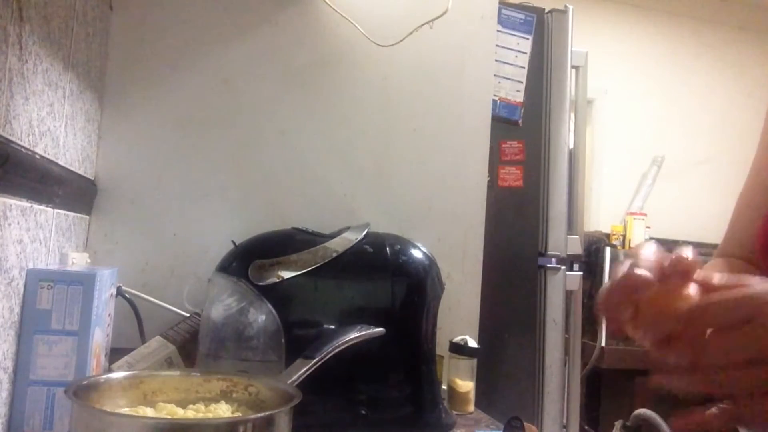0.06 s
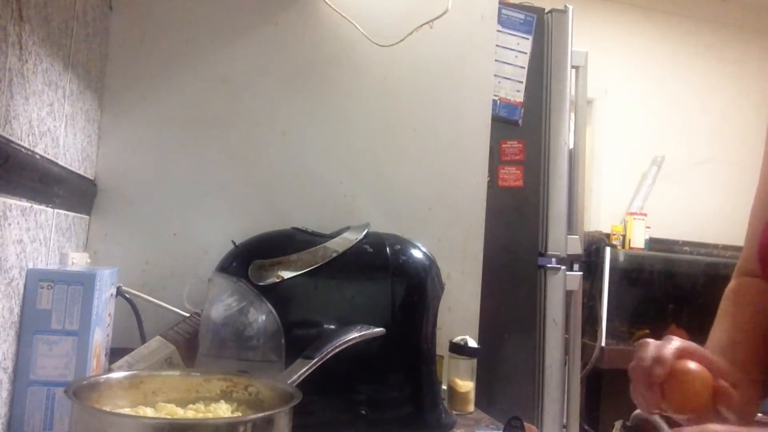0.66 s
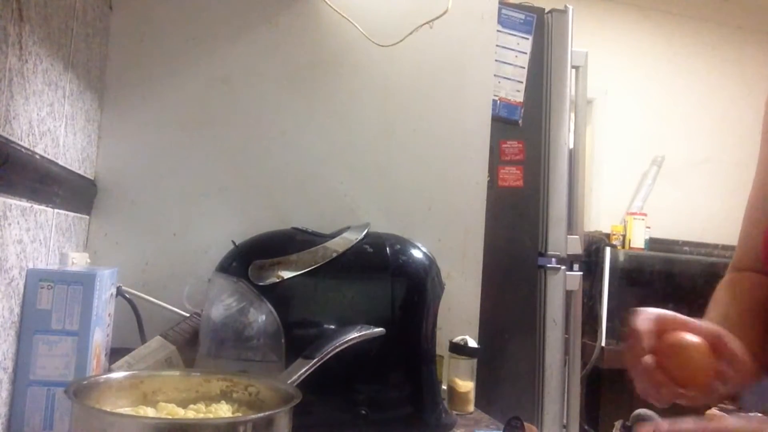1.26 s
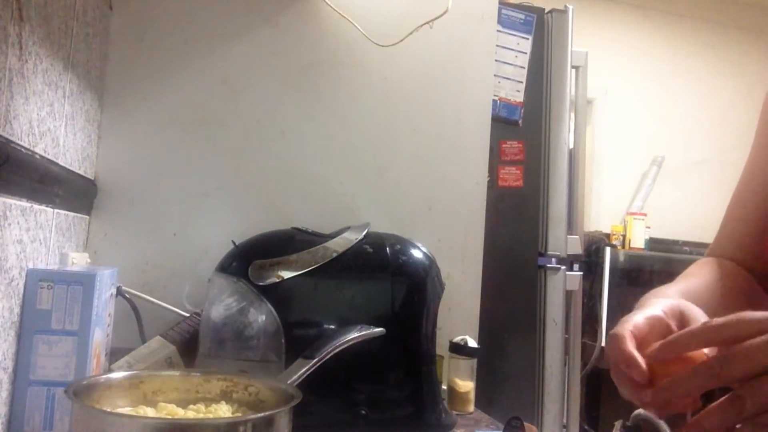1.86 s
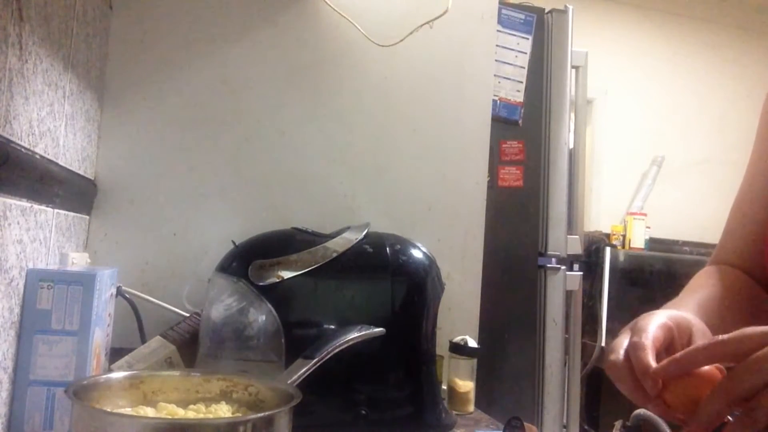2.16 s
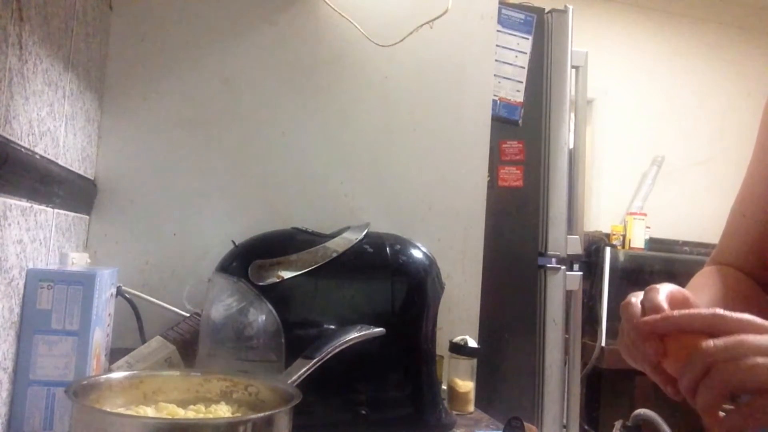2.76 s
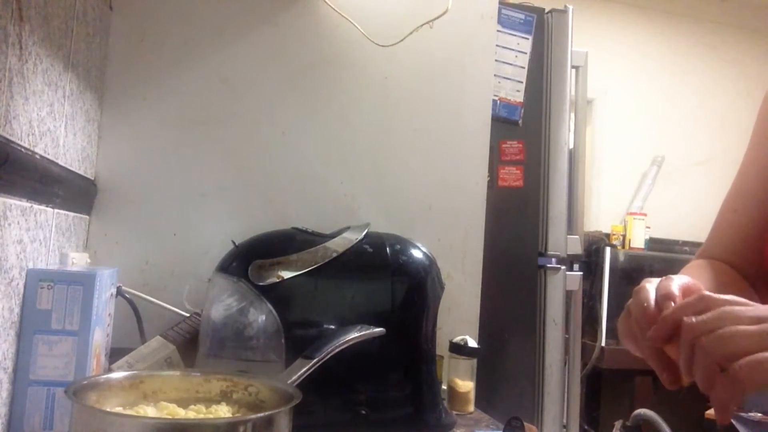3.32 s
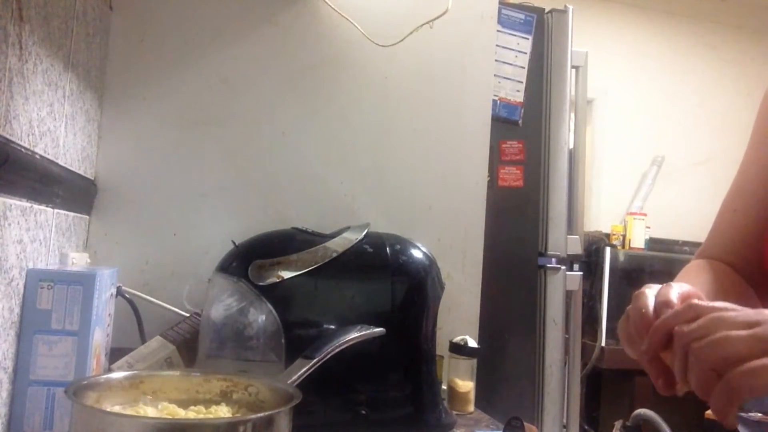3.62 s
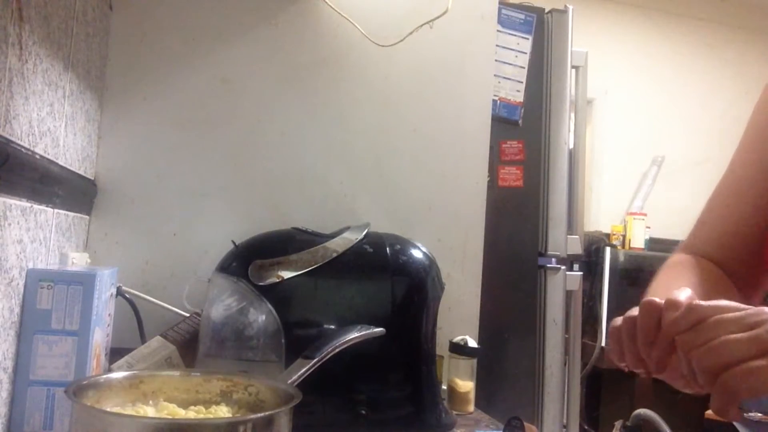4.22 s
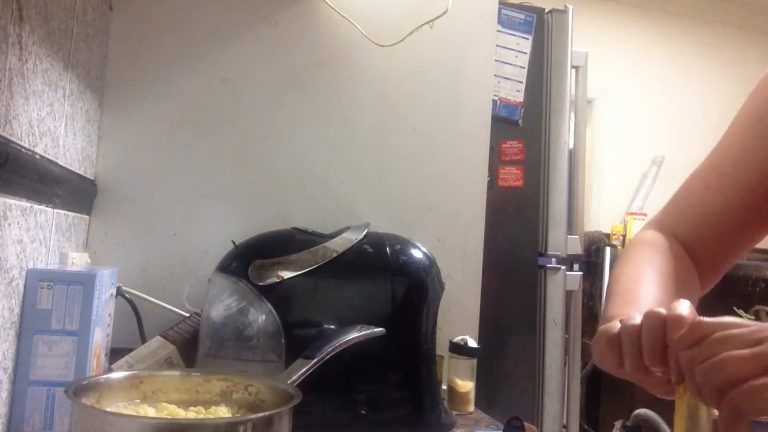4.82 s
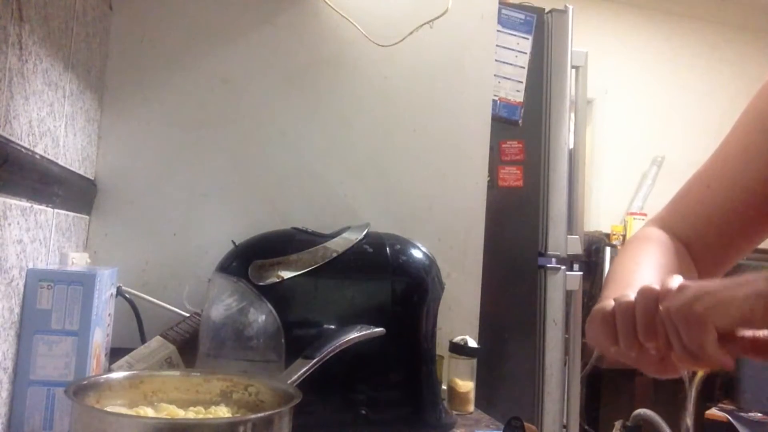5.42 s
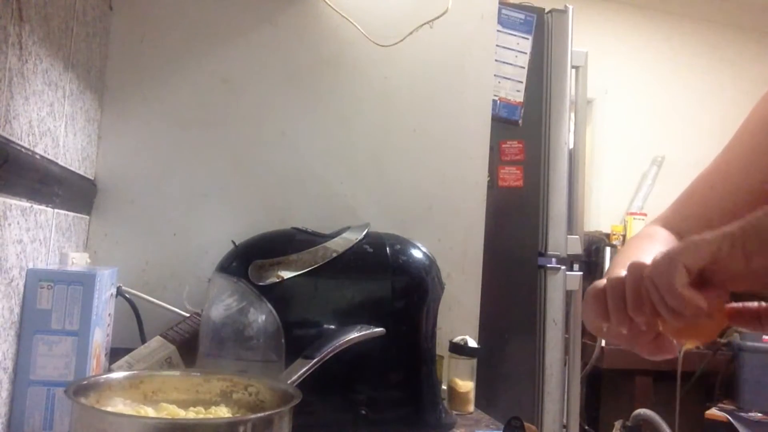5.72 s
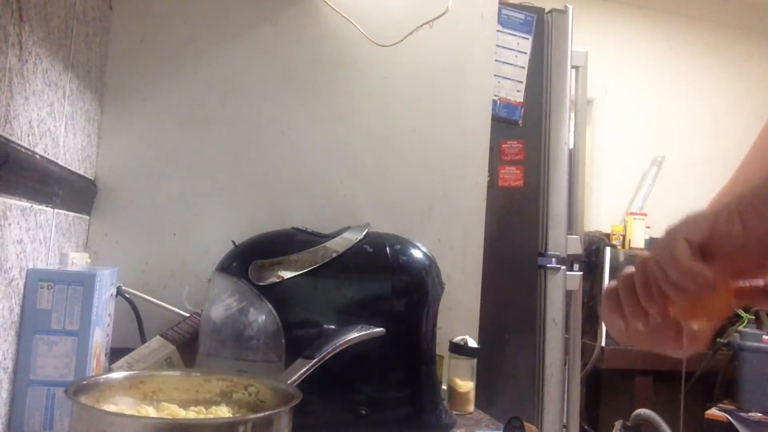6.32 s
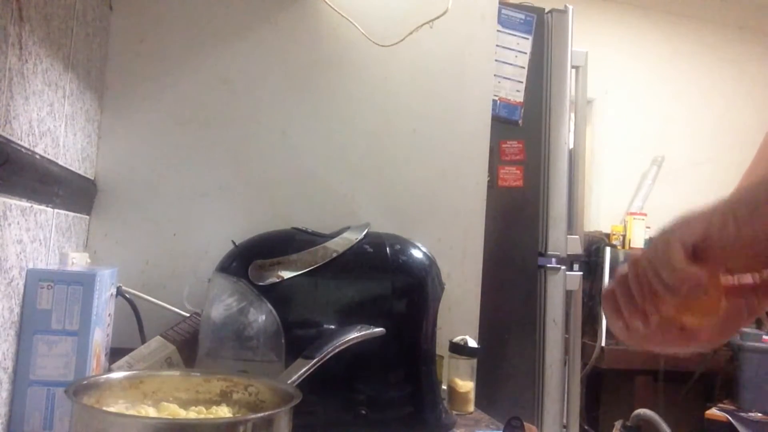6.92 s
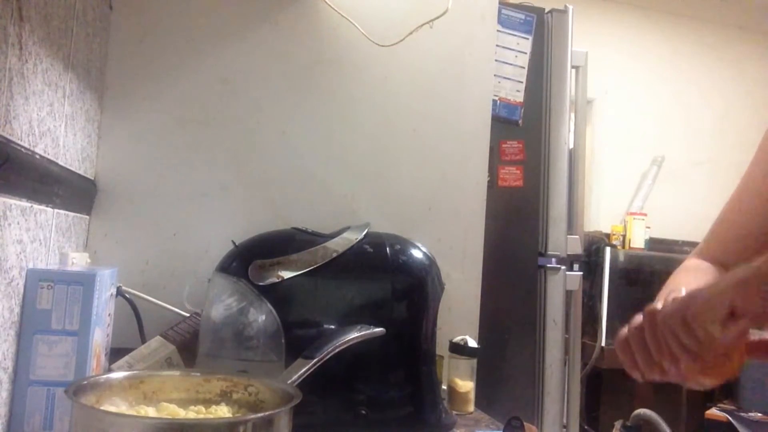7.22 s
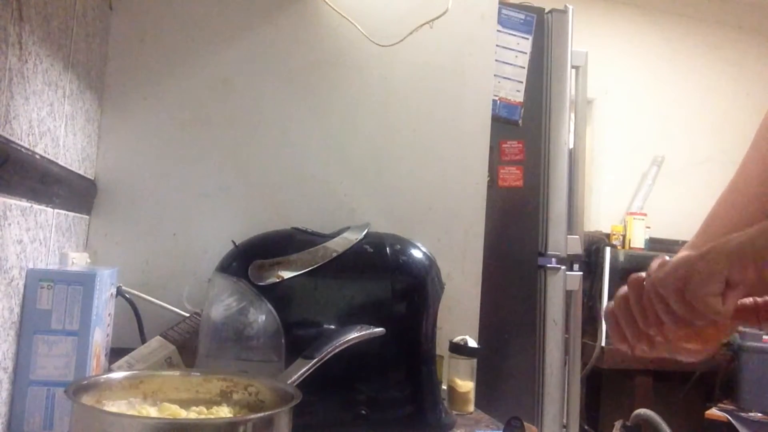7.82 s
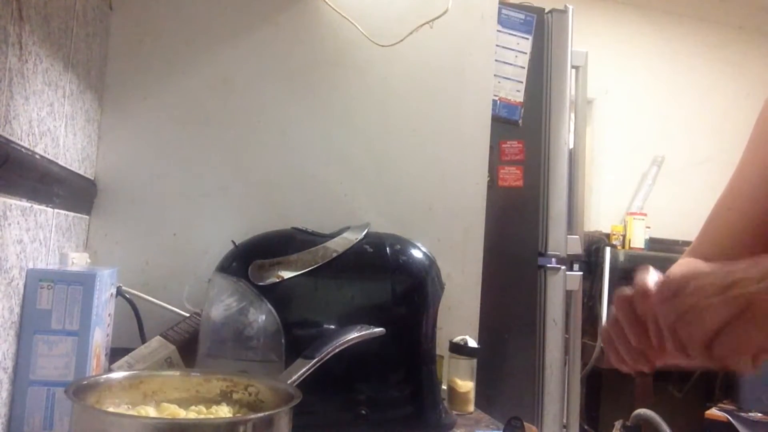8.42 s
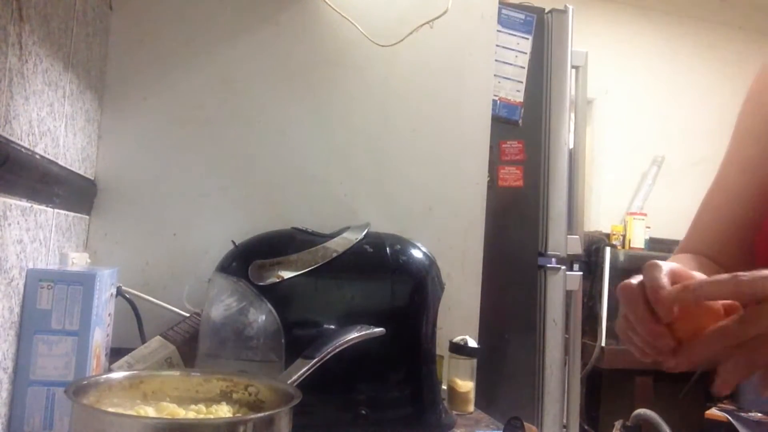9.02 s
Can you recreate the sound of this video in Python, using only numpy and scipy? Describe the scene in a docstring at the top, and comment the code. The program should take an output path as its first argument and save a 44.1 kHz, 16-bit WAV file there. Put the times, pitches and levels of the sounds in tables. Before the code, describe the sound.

Two sharp egg taps, then crackling and crunching eggshell in a small kitchen, with a softly simmering pan and a throbbing appliance.

```python
"""Cracking an egg in a small kitchen

An appliance motor throbs and slowly loses speed; bubbles burst faintly in a pan over the room's hiss.
Wet fingers slip on an egg. It touches a hard edge, is knocked on it once and is cracked with a sharp
tap, and the worktop thuds along. Thumbs pry the shell open: each crack runs in tiny jumps that make
the pieces and the hollow inside ring. At the end the empty halves crunch in the hand."""
import sys
import numpy as np
from scipy import signal
from scipy.fft import rfft, irfft, next_fast_len
from scipy.io import wavfile
from scipy.ndimage import uniform_filter1d

SR = 44100
rng = np.random.default_rng(int(sys.argv[2]) if len(sys.argv) > 2 else 0)


def inscribe(sig):
    """Save sig as 16-bit PCM at rate SR to the path in sys.argv[1].

    A 1-D sig is mono; a 2-D sig holds one channel per row.
    Samples are clipped to [-1, 1] before scaling.
    """
    pcm = np.round(np.clip(np.atleast_2d(sig).T, -1, 1) * 32767)
    wavfile.write(sys.argv[1], SR, pcm.astype(np.int16))


N = 399976
T = np.arange(N) / SR  # seconds since the scene began
AGE = T[:SR // 2]  # seconds since one short sound began

# The tone colour of the simmering pan. Each row: frequency in Hz, level in dB.
PAN_COLOUR = [(150, -9), (330, 7), (480, 4.5), (630, 3.5), (780, -3), (970, 2), (1250, -4.5), (1400, 3),
              (1620, -10), (2340, -2), (2700, -9), (3200, -4.5), (4400, -13), (7500, -20), (16000, -40)]
# The tone colour of breaking shell. Each row: frequency in Hz, level in dB.
SHELL_COLOUR = [(200, -36), (600, -24), (950, -52), (1500, -13), (2050, -40), (2550, 2.5), (2950, -9.5),
                (3400, 2.5), (4500, 0.5), (5550, 2), (6400, 1), (7750, 2), (9300, -1), (11200, -5),
                (14500, -2), (18000, -27)]
# How a bit of shell, or the edge, rings around its pitch. Each row: multiple of the pitch, level in dB.
RING_SHAPE = [(.2, -51), (.6, -35), (.84, -11.5), (.95, 2), (1.05, 3.5), (1.16, -20), (1.5, -18.5),
              (8, -52)]


def undb(db):
    """Turn decibels into a number to multiply a sound by."""
    return 10 ** (np.asarray(db) / 20)


def unit(x):
    """Scale a sound so that its average strength (rms) is 1."""
    return x / np.sqrt(np.mean(x ** 2))


def add(out, start_s, x):
    """Mix the sound x into out, beginning at start_s."""
    i = int(start_s * SR)
    out[i:i + len(x)] += x[:N - i]


def curve(rows):
    """Join rows that begin with a time by straight lines, giving one curve for each further column."""
    times, *columns = np.transpose(rows)
    return [np.interp(T, times, column) for column in columns]


def at_hz(rows, hz):
    """Look up the value at hz between rows of frequency and value."""
    frequencies, values = np.transpose(rows)
    return np.interp(np.log(hz + 1), np.log(frequencies), values)


def noise(colour, size):
    """Steady noise with the given tone colour."""
    padded = next_fast_len(size)
    hz = np.arange(padded // 2 + 1) * SR / padded
    spectrum = rfft(rng.standard_normal(padded)) * undb(at_hz(colour, hz))
    return unit(irfft(spectrum, padded)[:size])


def fade(t60):
    """A dying away; t60 is the fade time, the seconds it takes to drop by 60 dB."""
    return np.exp(-np.log(1000) * AGE / t60)


def soften(x, hz):
    """A soft contact or a covering hand takes away the treble above hz."""
    return signal.sosfilt(signal.butter(2, min(hz, SR / 2 - 1000), fs=SR, output="sos"), x)


def burst(colour, t60, size=len(AGE)):
    """Countless short vibrations struck together sound like fading noise of this colour."""
    decay = fade(t60)[:size]
    spectrum = rfft(rng.standard_normal(size) * decay)
    # even out the energy over every 400 Hz
    spectrum /= np.sqrt(uniform_filter1d(abs(spectrum) ** 2, size=size * 400 // SR))
    # build a colour filter that makes no sound before the strike
    hz = np.arange(len(spectrum)) * SR / size
    cepstrum = irfft(np.log(undb(at_hz(colour, hz))), size)
    cepstrum[1:size // 2] *= 2
    cepstrum[size // 2:] = 0
    x = irfft(spectrum * np.exp(rfft(cepstrum)), size) * (np.arange(size) < size // 2)
    return x * np.sqrt(np.sum(decay ** 2) / np.sum(x ** 2))


def resonance(shape, hz, t60, size=len(AGE)):
    """Many vibrations crowd around one pitch and fade together."""
    return burst(sorted((hz * multiple, db) for multiple, db in shape), t60, size)


def ring(tones):
    """A struck object rings with a few fading tones, which start off in alternating directions."""
    return sum((-1) ** k * undb(db) * fade(t60) * np.sin(2 * np.pi * hz * AGE)
               for k, (hz, db, t60) in enumerate(tones))


def motor(start_hz=24.85, slowing_hz_per_s=0.77, settled_hz=21.67, sag_hz_per_s=0.078, build_s=1):
    """A slowing shaft makes a cabinet hum; neighbouring tones beat together into one throb a turn."""
    # The hum. Each row: time in seconds, levels in dB of the tones at 5, 6 and 7 times the turning
    # speed, level in dB of the overtones.
    hum_levels = [(1.25, -53, -51.5, -67, -77), (1.85, -71, -50.5, -59, -74), (2.2, -74, -58, -62, -73),
                  (2.55, -48, -55, -50, -60), (2.9, -38.5, -39.5, -46.5, -55.5),
                  (3.2, -47.5, -62, -50.5, -62.5), (3.55, -44.5, -34.5, -44, -63),
                  (3.85, -38, -42, -43, -67), (4.12, -50.5, -54, -49, -73), (4.4, -44.5, -50.5, -49, -55),
                  (4.8, -44, -49, -58, -65), (5.25, -43, -49.5, -55, -75), (5.7, -45.5, -68, -52.5, -65),
                  (6.1, -50.5, -57, -83, -68), (6.5, -42, -46, -52, -73), (7.7, -46, -48.5, -57, -89),
                  (8.25, -50, -50, -88, -63), (8.7, -70, -47, -60, -74), (9.07, -62, -53, -55.5, -62)]
    # Overtones the cabinet lets through. Each row: multiple of the turning speed, level in dB.
    overtones = [(8, -5.5), (10, 0), (11, -0.5)]
    # A low drone that follows the motor and swells late. Each row: time in seconds, level in dB.
    drone_levels = [(0, -57.5), (3, -61.5), (4.5, -86), (7.2, -60), (8.2, -53), (9.07, -59)]
    # The cabinet's rumble. Each row: frequency in Hz, level in dB.
    rumble_colour = [(20, -35), (35, -24), (48, -5.5), (58, -6.5), (75, -17.5), (100, 1.5), (140, -9),
                     (180, -10.5), (260, -20.5), (600, -46.5)]
    turns_per_s = np.maximum(start_hz - slowing_hz_per_s * T, settled_hz - sag_hz_per_s * T)
    angle = 2 * np.pi * np.cumsum(turns_per_s) / SR
    *tones_db, overtones_db = curve(hum_levels)
    hum = sum(undb(db) * np.cos(k * angle) for k, db in zip((5, 6, 7), tones_db))
    hum += sum(undb(overtones_db + db) * np.cos(k * angle) for k, db in overtones)
    drone = np.sqrt(2) * undb(curve(drone_levels)[0] - 1) * np.sin(2.665 * angle)
    rumble = undb(-53) * noise(rumble_colour, N)
    build_up = undb(-7 * np.maximum(1 - T / build_s, 0))
    return build_up ** 2 * hum + build_up * rumble + drone


def room_hiss(flutter_db=2.5, flutter_hz=25):
    """The air of the kitchen hisses and flutters slightly."""
    # The tone colour of the hiss. Each row: frequency in Hz, level in dB.
    colour = [(20, -7), (150, 6), (260, 1), (330, 8), (480, -3), (650, -5), (780, -15.5), (1000, -2.5),
              (1250, -13), (2500, -11), (4000, -12.5), (7500, -12.5), (8600, -18), (15500, -18)]
    # Its loudness. Each row: time in seconds, level in dB.
    levels = [(0, -59), (2.3, -59), (4.3, -58.5), (6, -59), (9.07, -58)]
    flutter = noise([(1, 0), (flutter_hz, 0), (flutter_hz * 4, -60)], N)
    return undb(curve(levels)[0] + flutter_db * flutter) * noise(colour, N)


def plop(t60, tone_db, swell_s=0.00059, rise_per_s=6):
    """A bubble opens: a wet puff in the pan and a brief rising tone."""
    hz = 700 * 5 ** rng.random()
    tone = np.sin(2 * np.pi * hz * AGE * (1 + rise_per_s * AGE / 2)) * fade(t60)
    return (burst(PAN_COLOUR, t60) + undb(tone_db) * tone) * (1 - np.exp(-AGE / swell_s))


def simmer(medium_count=20, small_count=260, tiny_count=3000, spatter_s=0.017, spatter_db=-8):
    """A pan simmers: bigger bubbles burst and spatter, small ones pop and the tiniest fizz."""
    # The largest bubbles. Each row: start in seconds, level in dB.
    large = [(0.012, -49.5), (1.405, -47.5), (1.651, -50), (2.353, -45.5), (2.837, -52.5), (4.347, -46.5),
             (4.412, -52), (4.878, -48.5), (5.286, -50), (5.756, -48.5), (5.865, -49), (6.035, -54),
             (6.049, -43.5), (6.229, -49.5), (6.346, -48.5), (6.362, -47), (6.384, -48.5), (6.685, -49.5),
             (6.799, -48), (6.84, -52), (7.35, -53), (7.878, -48.5)]
    out = np.zeros(N)
    pops = [plop(t60=0.035, tone_db=-3) for _ in range(16)]
    # medium bubbles come loosely one after another from 1 second on
    medium = [(1 + (T[-1] - 1) * (k + when) / medium_count, -56 + 3 * (2 * size - 1))
              for k, (when, size) in enumerate(rng.random((medium_count, 2)))]
    for start_s, db in large + medium:
        add(out, start_s, undb(db) * plop(t60=0.053, tone_db=-10))
        for delay, pick in rng.random((3, 2)):  # three droplets fall back
            add(out, start_s + spatter_s * delay, undb(db + spatter_db) * pops[int(pick * len(pops))])
    for k, (when, size) in enumerate(rng.random((small_count, 2))):
        add(out, when * T[-1], undb(-60 + 8 * size) * pops[k % len(pops)])
    tiny_db = 4 * np.minimum(rng.exponential(size=tiny_count), 3)
    signs = rng.choice([-1, 1], size=tiny_count)
    clicks = np.zeros(N)
    clicks[rng.integers(0, N, size=tiny_count)] = undb(tiny_db) * signs
    fizz = unit(signal.fftconvolve(clicks, burst(PAN_COLOUR, 0.025))[:N])
    return out + undb(-67) * fizz


def finger_slips(t60=0.066, swell_s=0.00044):
    """Wet fingers slip on the shell, each time with a short, dull rustle."""
    # The slips. Each row: start in seconds, level in dB.
    slips = [(0.396, -51), (0.523, -50.5), (1.937, -49.5), (2.002, -65), (2.945, -54.5), (3.146, -57),
             (3.29, -53), (3.399, -56), (3.492, -45.5), (3.514, -46), (3.733, -52), (3.81, -52),
             (3.936, -46.5), (4.203, -52), (4.238, -53), (4.452, -54.5), (4.71, -45), (5.559, -55),
             (5.659, -50.5), (7.105, -55.5)]
    # The tone colour of skin on shell. Each row: frequency in Hz, level in dB.
    skin_colour = [(150, -28), (500, 9), (1000, -1), (2000, -0.5), (3200, 0.5), (4500, -13), (7500, -26),
                   (15000, -24)]
    out = np.zeros(N)
    for start_s, db in slips:
        add(out, start_s, undb(db) * burst(skin_colour, t60) * (1 - np.exp(-AGE / swell_s)))
    return out


def egg_taps(hardest_hz=9600):
    """The egg hits the edge; softer contact is duller. Returns the clack and the worktop's thud."""
    # The taps. Each row: start in seconds, thud level in dB, knock level in dB, treble limit of the
    # contact in Hz, level in dB of the whole egg's ring.
    taps = [(0.576, -34, -26.5, 1200, -61), (0.583, -29.5, -17, 910, -60), (0.61, -53, -29, 750, -70),
            (0.833, -10.5, -5.5, 2770, -31.5), (0.931, -35.5, -24.5, 900, -70),
            (1.0434, -23.5, -5, 9600, -43), (1.19, -55, -33, 1520, -70), (1.337, -45, -36, 710, -74)]
    # The tones of the unbroken egg, the edge and the worktop, then the edge's crowded bands of tones.
    # Each row: pitch in Hz, level in dB, fade time in seconds.
    egg_tones = [(2665, -9, .1), (3020, -6, 0.11), (4200, -8, 0.088), (5276, -1, 0.12), (6412, -17, .08)]
    edge_tones = [(954, 5.5, 0.05), (1070, 7.5, 0.035), (1250, -16, .08), (1500, -4, 0.045),
                  (1950, 2, 0.042), (2060, 6, 0.058), (2170, -14, 0.17), (4090, 1, .035), (4250, 3, 0.05),
                  (5700, -15, .07)]
    worktop_tones = [(113.5, -12, 0.42), (134, -5.5, 0.21), (200.6, 1.5, 0.25), (226, -2, 0.26),
                     (328.4, -11, 0.37), (348.5, -3, 0.24), (417, -2.5, 0.16), (478, -16.5, 0.27),
                     (572, -12, 0.18), (624, -23, 0.064), (668, -5, 0.15), (822, -5.5, 0.15),
                     (922, -31, 0.07)]
    edge_bands = [(2020, -4, .012), (2400, -12, .05), (4200, -7, .02)]
    # The tone colour of the knock. Each row: frequency in Hz, level in dB.
    knock_colour = [(60, -20), (160, -6), (280, -3), (520, -5), (750, -3.5), (1050, -5), (1500, -5.5),
                    (2050, -3.5), (3000, -9), (4200, -9.5), (8000, -14.5), (16000, -17)]
    clack, thud = np.zeros(N), np.zeros(N)
    for start_s, thud_db, knock_db, contact_hz, egg_db in taps:
        knock = burst(knock_colour, t60=0.059) + undb(-5) * burst(knock_colour, t60=0.011)
        add(clack, start_s, undb(knock_db) * soften(knock, contact_hz) + undb(egg_db) * ring(egg_tones))
        # a soft tap barely rings the edge or cracks the shell
        softness_octaves = np.log2(hardest_hz / contact_hz)
        edge_db = knock_db - 9.5 - 16.5 * softness_octaves
        crack_db = knock_db - 7 - 21 * softness_octaves
        # the shell splits at once and then crumbles
        crumbs = signal.fftconvolve(crack_jumps(0.048), burst(SHELL_COLOUR, t60=0.0034))[:len(AGE)]
        split = undb(4.5) * burst(SHELL_COLOUR, t60=0.023) + burst(SHELL_COLOUR, t60=0.049)
        crack = split + undb(-9) * crumbs
        bands = sum(undb(db) * resonance(RING_SHAPE, hz, t60) for hz, db, t60 in edge_bands)
        edge = ring(edge_tones) + bands
        # shell and edge are stiffer than the filled egg and keep an octave more treble
        add(clack, start_s, soften(undb(crack_db) * crack + undb(edge_db) * edge, 2 * contact_hz))
        add(thud, start_s, undb(thud_db) * ring(worktop_tones))
    return clack / 2, thud / 2


def crack_jumps(length_s, count=24, snap_s=0.0094):
    """A crack runs in small, shrinking jumps; a quick one starts with a snap, a slow one crumbles."""
    jumps = np.zeros(len(AGE))
    when = (np.arange(count) + rng.random(count)) / count
    jumps[(when * length_s * SR).astype(int)] = rng.standard_normal(count) * (1 - when / 2)
    jumps[0] = 5.7 * np.exp(-length_s / snap_s)
    return jumps


def crackle(jumps, sounds):
    """Each jump sets off the next of these sounds in turn; the loudest 5 ms are scaled to strength 1."""
    turn = np.cumsum(jumps != 0) % len(sounds)
    out = sum(signal.fftconvolve(jumps * (turn == k), sound) for k, sound in enumerate(sounds))
    return out / np.sqrt(uniform_filter1d(out ** 2, SR // 200).max())


def shell_breaking(piece_t60=0.017, hollow_t60=0.036, hands_close_s=8, variants=3, size=4096):
    """Each crack ticks and rings a loose piece and the hollow shell. Returns snaps and hollow rings."""
    # The cracks. Each row: start in seconds, snap level in dB, the hollow's level in dB and pitch
    # in Hz, the loose piece's level in dB and pitch in Hz, crumbling time in seconds.
    cracks = [(2.353, -42.5, -62, 1170, -49, 7850, .002), (2.718, -52.5, -49, 2600, -64, 6530, .006),
              (3.227, -52, -49, 3040, -50, 5900, 0.0016), (3.4855, -44, -49, 2300, -41, 7000, 0.0036),
              (3.492, -52, -44, 2900, -52, 7000, .005), (3.502, -43, -45, 2290, -39, 7300, 0.017),
              (3.519, -35, -46, 1680, -46, 7600, 0.013), (3.529, -58, -62, 2400, -50, 5040, 0.02),
              (3.557, -46, -46, 3000, -49, 6800, 0.0029), (4.681, -34, -43, 2250, -46, 3330, 0.00243),
              (4.685, -46, -45, 1200, -38, 3350, 0.0042), (4.712, -28, -37, 1340, -41, 5200, 0.028),
              (4.7322, -15.5, -24, 2500, -24.5, 3370, .0035), (4.736, -24, -37, 1600, -27, 5500, 0.0084),
              (4.7481, -19, -31, 2400, -34, 5400, 0.0016), (4.7525, -17, -43, 1750, -17.5, 5400, .0018),
              (4.761, -29, -44, 1740, -33, 6000, 0.012), (5.199, -50, -55, 2420, -46.5, 7940, 0.018),
              (5.3726, -52, -38.5, 1620, -52, 3870, 0.004), (7.0911, -32, -55, 1900, -38, 4700, .001),
              (7.105, -32, -32.5, 1510, -34.5, 3640, 0.0034), (8.093, -52, -45, 2220, -65, 5530, 0.00414),
              (8.2547, -56, -38, 1620, -56, 7000, 0.005), (8.281, -56, -54, 1600, -53, 6900, .004),
              (8.359, -46, -38, 1730, -52, 5500, .006), (8.365, -40, -27.5, 1780, -55, 5600, 0.019),
              (8.381, -47, -28, 1750, -51, 5500, 0.012), (8.396, -42, -30, 1780, -51, 5600, .009),
              (8.408, -54, -35, 1950, -58, 5500, 0.022), (8.422, -43, -29, 1690, -54, 6400, 0.0061),
              (8.428, -43, -27.5, 1610, -46, 5600, .004), (8.452, -39.5, -36, 1670, -46, 6360, 0.013),
              (8.466, -61, -44, 1680, -59, 5600, .03), (8.54, -46, -30.5, 1600, -56, 5530, 0.005),
              (8.591, -41.5, -55, 1890, -41, 5330, .004), (8.6889, -32.5, -21, 1550, -34, 5600, 0.0054),
              (8.709, -34, -44, 1650, -31, 7650, 0.0053), (8.7358, -34.5, -32, 1770, -37, 7800, 0.0015),
              (8.861, -63, -40.5, 1650, -62, 5500, 0.009), (8.921, -40, -35, 1740, -52, 5500, .006),
              (8.9285, -29.5, -23, 1630, -34, 5540, .0048), (8.936, -31.5, -34, 1560, -42, 5700, 0.0049),
              (8.951, -43, -33, 1560, -54, 5500, .008)]
    # The hollow, damped by the hand, gives out little below its pitch.
    # Each row: multiple of the pitch, level in dB.
    hollow_shape = [(.25, -47), (.55, -29), (.76, -18), (.88, -1), (1, 5.5), (1.14, -2), (1.38, -8.5),
                    (2.12, -18.5), (10, -58)]
    snaps, hollows = np.zeros(N), np.zeros(N)
    for start_s, snap_db, hollow_db, hollow_hz, piece_db, piece_hz, length_s in cracks:
        jumps = crack_jumps(length_s)[:size]
        # a stronger or quicker crack is brighter
        top_hz = 11200 * 2 ** ((snap_db + 54) / 76) * (0.012 / length_s) ** 0.12
        if start_s > hands_close_s:
            top_hz *= 0.46  # the hands close round the empty halves and muffle them
        tick = undb(5) * burst(SHELL_COLOUR, t60=0.0028, size=size)
        ticks = [tick + burst(SHELL_COLOUR, t60=0.028, size=size) for _ in range(variants)]
        piece_rings = [resonance(RING_SHAPE, piece_hz, piece_t60, size) for _ in range(variants)]
        hollow_rings = [resonance(hollow_shape, hollow_hz, hollow_t60, size) for _ in range(variants)]
        add(snaps, start_s, undb(snap_db) * crackle(jumps, soften(ticks, top_hz)))
        add(snaps, start_s, undb(piece_db) * crackle(jumps, piece_rings))
        add(hollows, start_s, undb(hollow_db) * crackle(jumps, hollow_rings))
    return snaps / 2, hollows / 2


def kitchen_echo(x, echo_db, build_s=0.0025):
    """Close walls add a short, dense echo whose highest treble dies first."""
    # How long the room rings. Each row: frequency in Hz, fade time in seconds.
    fade_times = [(100, 0.21), (500, 0.23), (2000, 0.21), (6000, 0.25), (15000, 0.16)]
    tail = 0
    for hz in 125 * 2. ** np.arange(8):
        band_hz = [hz / np.sqrt(2), min(hz * np.sqrt(2), SR / 2 - 1000)]
        octave = signal.butter(3, band_hz, "band", fs=SR, output="sos")
        tail = tail + signal.sosfilt(octave, rng.standard_normal(len(AGE))) * fade(at_hz(fade_times, hz))
    tail *= 1 - np.exp(-(AGE / build_s) ** 2)
    return x + undb(echo_db) * signal.fftconvolve(x, tail / np.linalg.norm(tail))[:N]


def scene():
    """Egg, pan, motor and hiss share one small room, mixed to one channel."""
    clack, thud = egg_taps()
    snaps, hollows = shell_breaking()
    egg = kitchen_echo(clack, echo_db=-10) + thud + kitchen_echo(hollows, echo_db=-10)
    small_sounds = kitchen_echo(snaps + finger_slips() + simmer(), echo_db=-9.5)
    return (egg + small_sounds + motor() + room_hiss())[None]


def record(dry):
    """The microphone rounds off the highest peaks and cuts the treble above 15500 Hz."""
    return signal.sosfilt(signal.ellip(10, 0.2, 70, 15500, fs=SR, output="sos"), np.tanh(dry))


dry = scene()
out = record(dry)
inscribe(out)
```